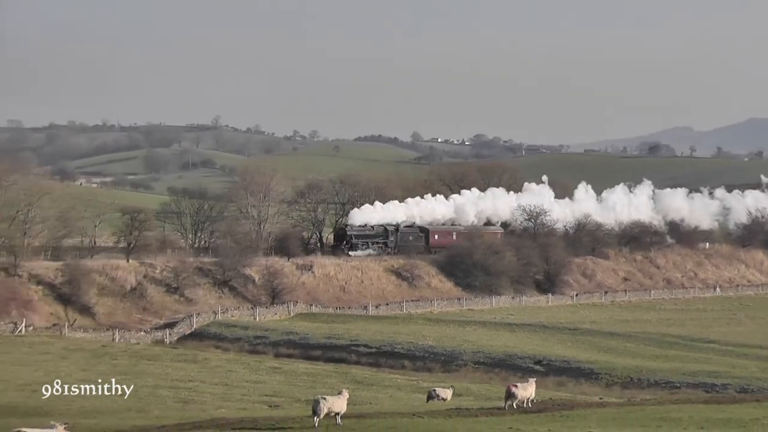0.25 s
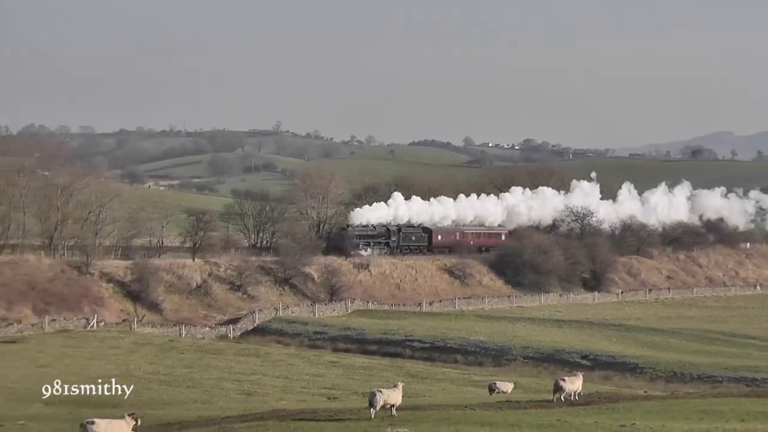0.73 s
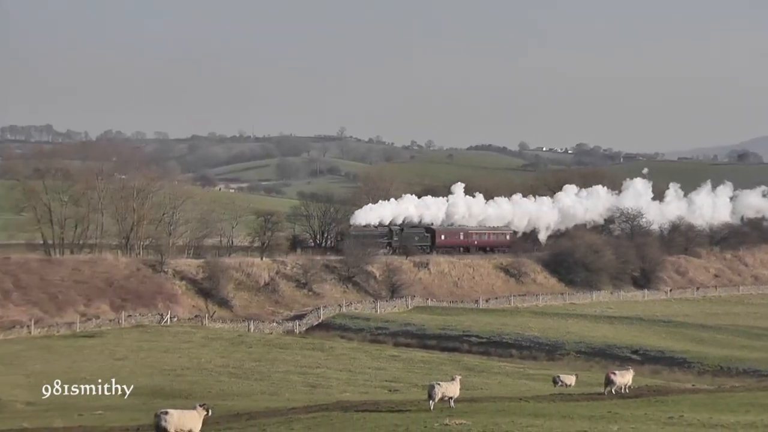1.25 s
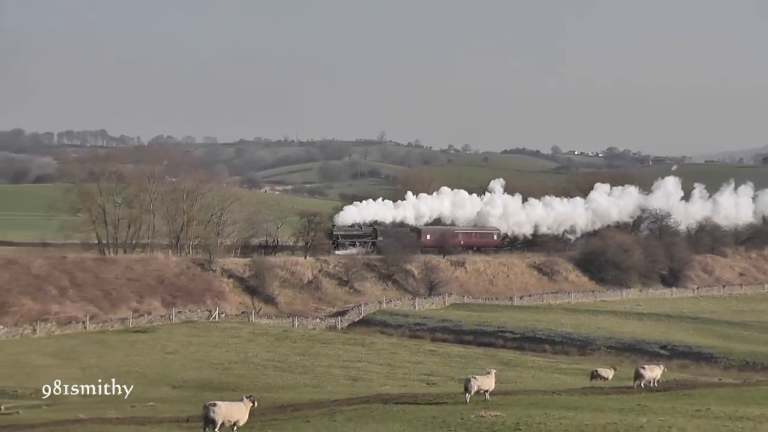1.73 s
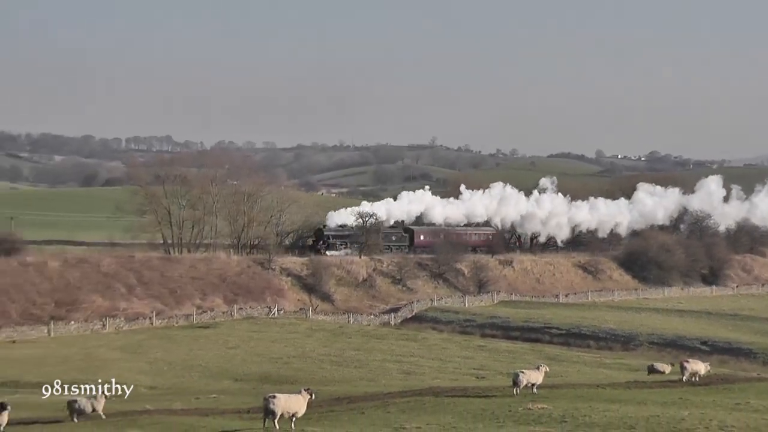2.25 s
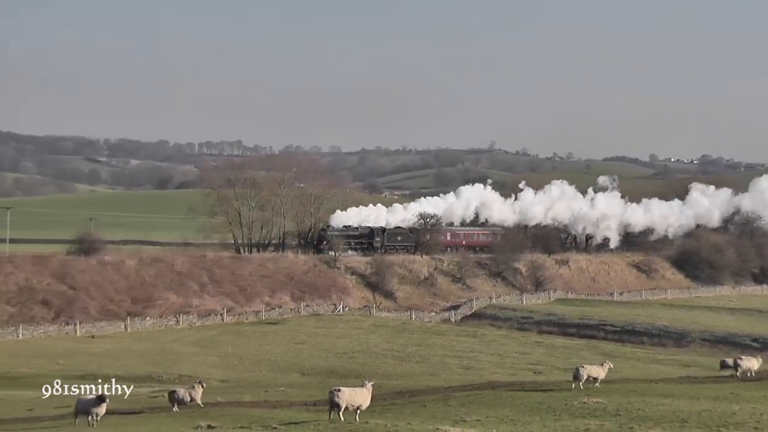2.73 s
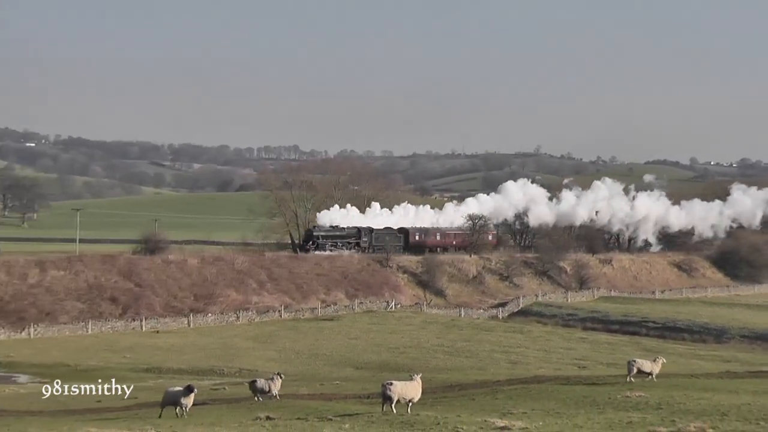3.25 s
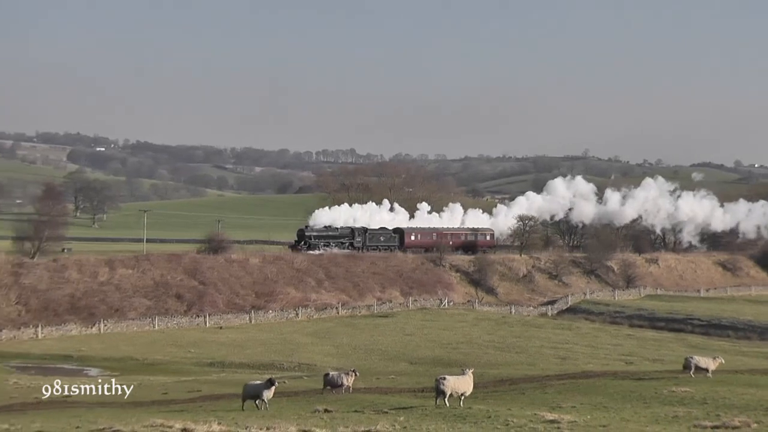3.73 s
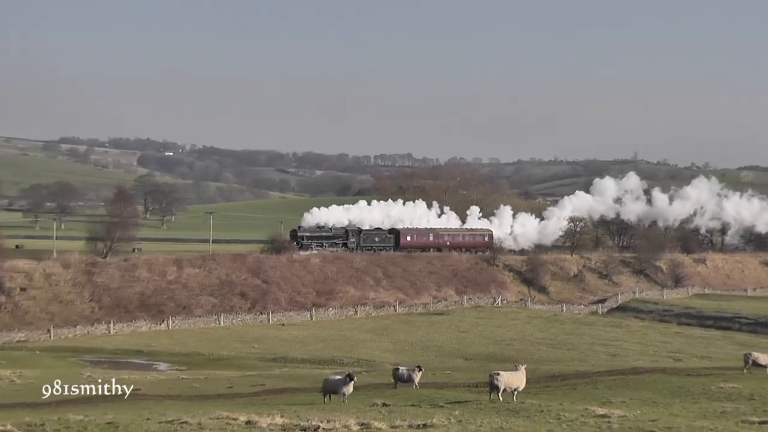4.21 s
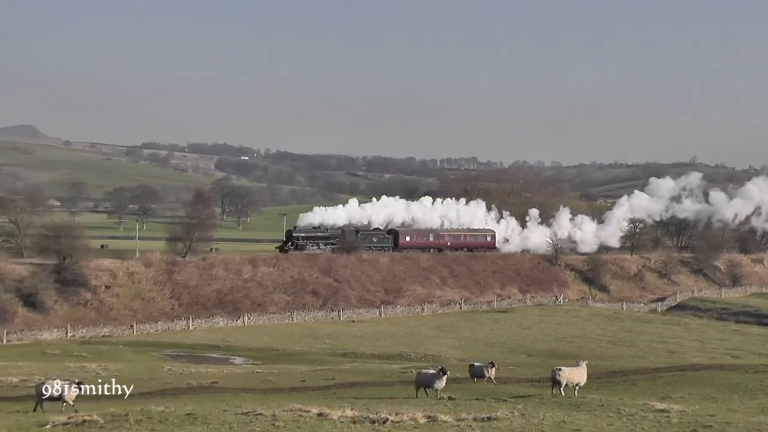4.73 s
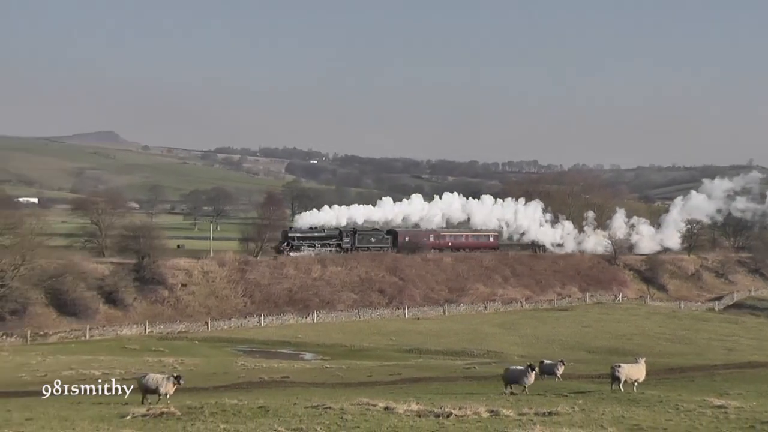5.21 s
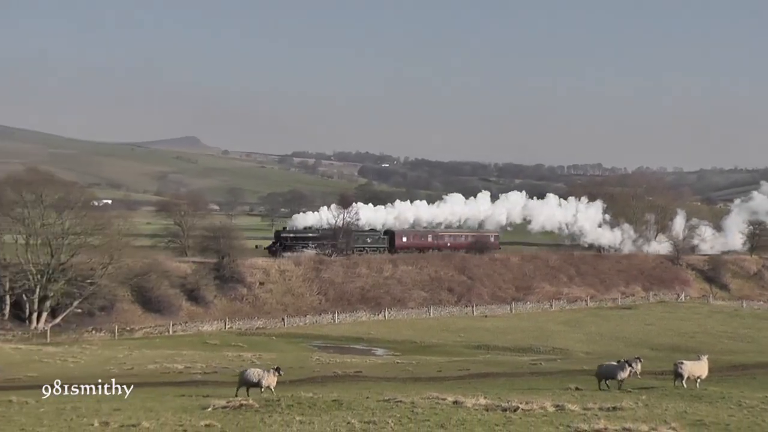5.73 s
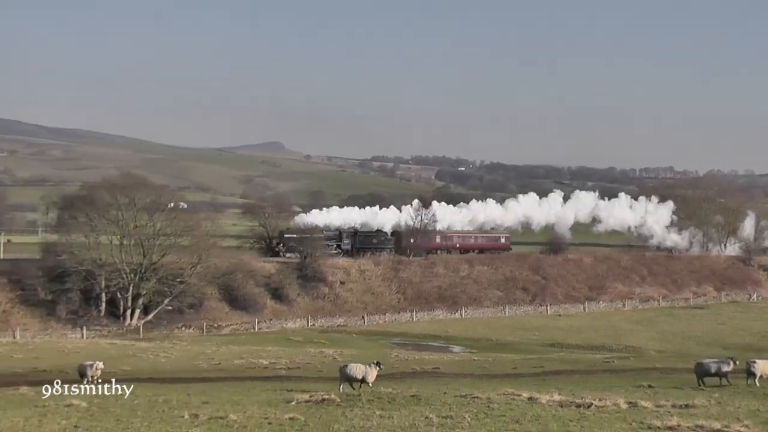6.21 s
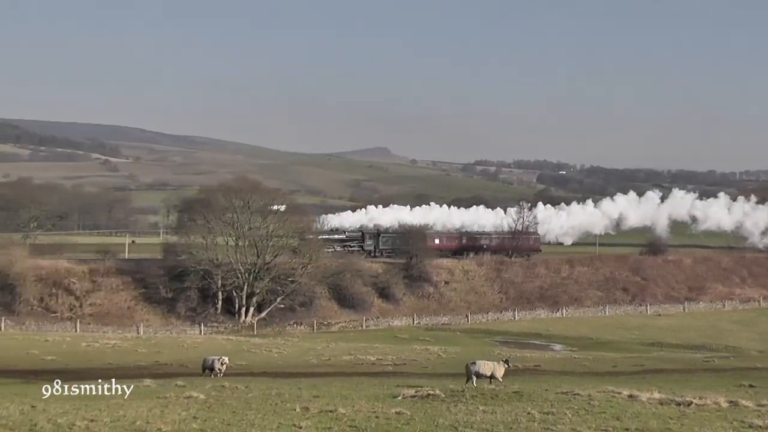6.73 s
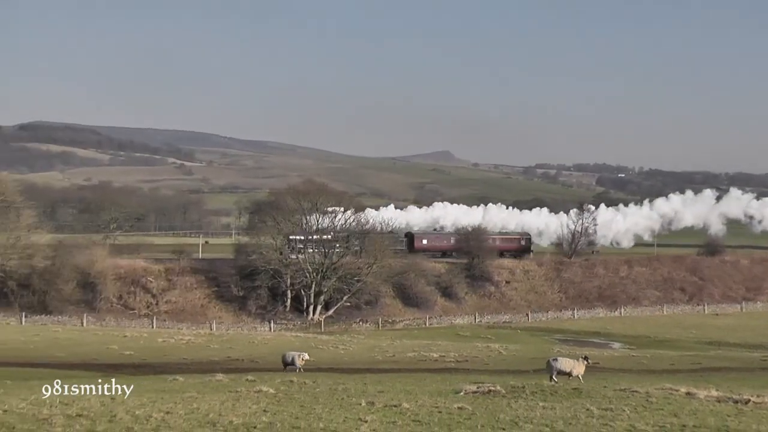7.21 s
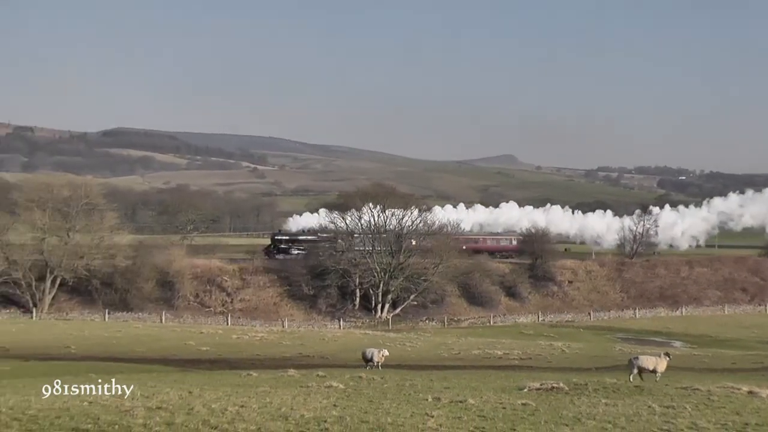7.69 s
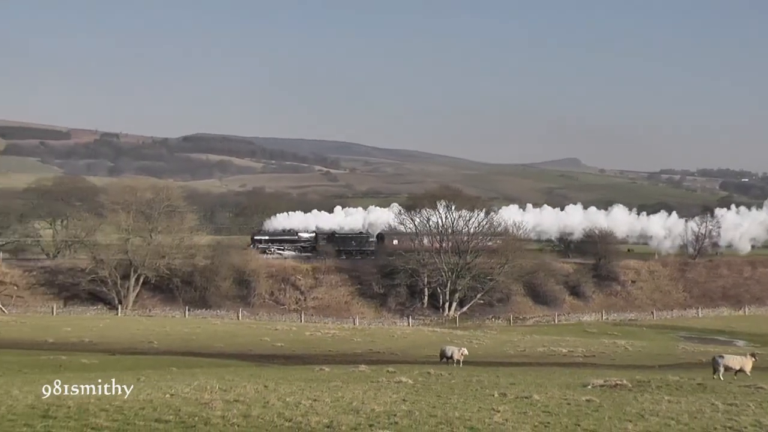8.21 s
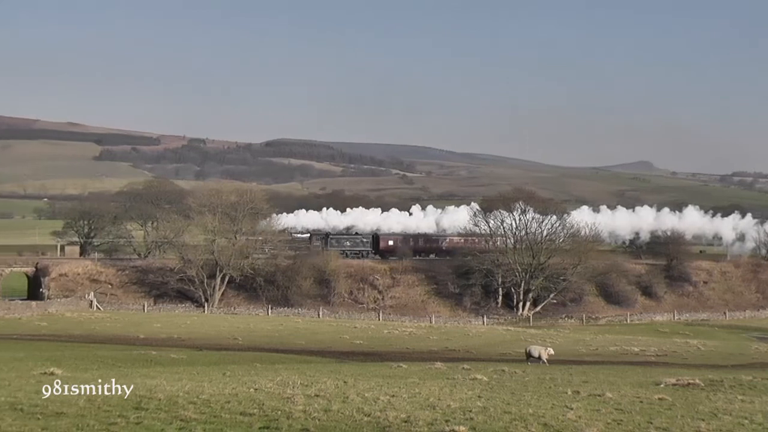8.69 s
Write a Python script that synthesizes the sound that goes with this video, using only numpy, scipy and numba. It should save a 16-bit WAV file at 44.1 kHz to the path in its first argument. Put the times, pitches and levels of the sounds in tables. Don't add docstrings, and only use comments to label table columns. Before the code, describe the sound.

Distant speeding steam train: quick chuffing thuds merge into a flutter, wheels roar and faintly ring, and wavering hiss grows louder and clearer.

```python
import sys
import numpy as np
from scipy import signal
from scipy.fft import rfft, irfft
from scipy.io import wavfile
from scipy.ndimage import uniform_filter1d
from numba import njit

SR = 44100
rng = np.random.default_rng(int(sys.argv[2]) if len(sys.argv) > 2 else 0)


def store_pcm(level_fs):
    pcm = np.round(np.clip(level_fs, -1, 1) * 32767).astype(np.int16)
    wavfile.write(sys.argv[1], SR, np.atleast_2d(pcm).T)


def to_linear_factor(level_db):
    exponent = np.asarray(level_db, float) / 20
    return 10 ** exponent


N = 394694
T = np.arange(N) / SR
COARSE_T = T[::256]
F = np.arange(N // 2 + 1) * SR / N

# time_s, rate_beats_per_s
BEAT_RATE = [
    (0, 19.27),
    (3.2, 19.0),
    (6.5, 18.78),
    (8.95, 18.25),
]
CYLINDER_DB = [-7, -6.5, -6, -8.5]
# time_s, level_db
EFFORT = [(0, -29.5), (.8, -29), (1.1, -24), (1.75, -25.5), (2.0, -27), (2.3, -22.5), (2.7, -26),
          (3.1, -22.5), (3.6, -26), (4.4, -24), (4.8, -26), (5.25, -22), (6.0, -27), (6.25, -19.5),
          (6.8, -24.5), (7.9, -19.5), (8.4, -22.5), (8.95, -20.5)]
# time_s, chimney_hz, rail_hz, rail_ring_share, top_treble_db, bank_echo_share, grass_dip_hz
PATH = [
    (0, 253, 850, 0.7, -13.5, .05, 410),
    (1.5, 263, 858, 1.1, -10, 0, 410),
    (3, 237, 893, 0.7, -7, 0.01, 374),
    (4.5, 222.3, 917, 0.9, -7, 0, 375),
    (6, 215, 940, 0, -2.5, 0.05, 400),
    (7.5, 205, 792, 1, -3.5, 0.17, 418),
    (8.95, 211.3, 766, 0.7, 3, 0, 390),
]
# time_s, level_db, low_tilt_db_per_octave
SCREEN = [(0, -2.5, -12), (.9, -3.5, -12.5), (1.3, -4.5, -0.5), (1.7, 2, -5), (2.4, 1, -4),
          (3.0, 1.5, -5.5), (3.4, -2.5, -2), (3.9, -6.5, 0.5), (4.7, -3.5, 3), (5.2, 2, -1.5),
          (6.1, 3.5, -3), (7.0, -0.5, 0.5), (8.0, 1, -2), (8.5, -1, -3), (8.95, 4, -8)]
# freq_hz, density_db
EXHAUST_SPECTRUM = [(12, -82), (20, -38.5), (97, -13), (141, -4.5), (215, -4), (238, -3), (285, -9),
                    (320, -13), (383, -19), (430, -7.5), (560, -61.5), (950, -120)]
# freq_hz, density_db
ROAR_SPECTRUM = [(240, -50), (400, -24), (465, -8), (545, -4.5), (649, -3.5), (742, -8.5), (858, -4),
                 (1460, -9.5), (1700, 0.5), (2210, -40.5), (3740, -120)]
# freq_hz, density_db
HISS_SPECTRUM = [(1500, -3.5), (1900, -2), (2300, -3), (2800, -1), (3250, -2), (3800, -6.5), (4400, -11),
                 (4900, -9), (5500, -10), (6500, -15), (7600, -20), (8300, -24), (9000, -31),
                 (10500, -41.5)]
# freq_hz, level_db
SCATTER = [(40, -10.5), (150, -29.5), (350, -16), (800, -18.5), (3000, -16), (6000, -16.5), (9000, -9)]
# centre_s, length_s, pitch_hz, width_hz, level_db
SINGING_WHEELS = [(1.754, 0.66, 873, 59.6, -24), (1.95, 0.47, 2820, 300, -26.5),
                  (2.727, 0.17, 2460, 400, -21), (4.656, 0.036, 3700, 300, -19.5),
                  (5.37, 0.16, 2320, 130, -21.5), (5.642, 0.13, 2330, 90, -20.5),
                  (6.9, 0.94, 1920, 199, -26), (6.804, 1, 643, 90, -25), (7.462, .2, 3200, 247, -22),
                  (8.05, 0.42, 3100, 400, -21.5), (8.097, 0.26, 2260, 150, -27.5),
                  (8.293, 0.29, 2850, 300, -26.5), (8.63, 0.57, 2950, 445, -22)]
# centre_s, length_s, pitch_hz,
# width_hz, level_db
JET_FLARES = [(5.1, 0.042, 3700, 1500, -33), (5.37, 0.049, 5300, 2200, -19),
              (5.68, 0.064, 4900, 980, -22.5), (4.27, .1, 2000, 700, -24.5),
              (6.033, .06, 3400, 1600, -20.5), (6.39, 0.13, 3540, 610, -25.5),
              (6.95, 0.064, 5200, 1200, -18.5), (7.23, 0.037, 5430, 990, -19),
              (8.4, 0.051, 3810, 1500, -21), (3.3, .16, 3600, 1200, -36), (8.78, 0.043, 6700, 1500, -23),
              (6.39, .12, 5700, 1500, -24), (1, 2.2, 872, 35, -32.5)]
# centre_s, length_s, pitch_hz, gain_db
EDDIES = [(0.039, 0.088, 2670.0, 6), (0.375, 0.96, 3280.0, 11.5), (1.368, 1.04, 4320.0, 13.5),
          (1.52, 0.53, 1240.0, 7.5), (1.819, 0.17, 3550.0, 8.5), (2.052, 0.51, 3060.0, 13),
          (2.27, 0.28, 1170.0, 3.5), (2.656, 0.56, 7070.0, 8.5), (2.687, 0.2, 2250.0, 3),
          (2.741, 0.41, 2610.0, 12.5), (3.322, 0.24, 4080.0, 9.5), (3.85, 0.28, 3330.0, 3.5),
          (4.002, 0.15, 2810.0, 5), (4.44, 0.66, 1820.0, 10.5), (4.527, 0.73, 6410.0, 14.5),
          (4.679, 0.17, 3060.0, 4.5), (4.96, 0.14, 5790.0, 8), (5.317, 0.33, 5150.0, 14.0),
          (5.46, 0.93, 1780.0, 10), (5.682, 0.25, 5020.0, 10), (6.04, 0.29, 4480.0, 4.5),
          (6.405, 0.33, 6610.0, 10.5), (6.9, 1.52, 1320.0, 9.5), (6.939, 0.1, 7070.0, 4),
          (6.953, 1.39, 5680.0, 10.5), (7.457, 0.26, 3170.0, 10), (7.998, 0.45, 3540.0, 13),
          (8.293, 0.15, 3700.0, 6.5), (8.579, 0.91, 2440.0, 9.5), (8.69, 0.23, 7070.0, 2.5)]
# centre_s, length_s, pitch_hz, gain_db
WISPS = [(0.15, 0.24, 1093, -3), (0.62, 0.14, 5400, -1.5), (0.84, 0.12, 3800, 5), (1.28, 0.26, 2760, 5.5),
         (1.48, 0.12, 1095, 5.5), (1.69, 0.8, 7070.0, 2), (2.15, 0.091, 3850.0, -7), (2.69, 0.16, 4100, -5),
         (3.06, 0.11, 2010.0, 3), (3.58, 0.43, 2500, 3), (3.76, 0.33, 1260, -3), (4.1, 0.25, 2140, 2.5),
         (4.21, 0.57, 3610.0, -4), (4.44, 0.17, 1090.0, -3), (4.6, 0.22, 1800, 3.5),
         (4.73, 0.56, 4530, 1.5), (5.08, 0.14, 1570, -2.5), (5.14, 0.1, 3060, 5.0), (5.55, 0.14, 1650, -4),
         (5.8, 0.2, 7100, -3.5), (5.97, 0.18, 1410, 3.5), (6.2, 0.12, 3700, 3), (6.43, 0.13, 2230.0, -6.5),
         (7.14, 0.092, 2990.0, 4), (7.78, 0.17, 3790.0, -3), (7.99, 0.078, 3610.0, -6.1),
         (8.34, 0.5, 1400.0, -1.5), (8.44, 0.38, 5870.0, -0.5), (8.79, 0.097, 2760, 6),
         (9.01, 0.64, 5920.0, -2)]
# centre_s, length_s, gain_db
CLEARINGS = [(4.9, .1, 3), (5.167, .07, 7.5), (5.579, .08, 8), (6.416, 0.068, 7.5), (6.575, .11, 6),
             (6.92, .12, 9.5), (7.21, .11, 7), (7.396, .1, 8), (7.87, 0.22, 9.5), (8.0, 0.044, 1.5),
             (8.33, 0.11, 5), (8.477, 0.054, 6.5), (8.595, .1, 4.5), (8.8, .05, 2.5)]
# centre_s, length_s, pitch_hz, width_hz, depth_share
SHADOWS = [
    (6.87, 2.3, 1575, 275, 0.8),
    (3.14, 2.2, 1450, 430, 0.3),
    (6.8, 3.4, 2580, 380, 0.5),
    (0.66, 1.5, 640, 120, 0.2),
    (6.6, 0.9, 4450, 250, 0.45),
]
# pitch_hz, width_hz, depth_share
HOUSING_DIPS = [(2610, 80, 0.4), (4440, 152, 0.5)]
# freq_hz, level_db
RIGHT_OVER_LEFT = [(40, 2), (300, 1.64), (1000, 1), (4000, 0.96)]
# freq_hz, level_db
TREBLE_GATE = [(5000, -100), (7000, -93), (8500, -67), (10000, -69.5)]

FIRST_BEAT_CYCLES = -.5
MID_APPROACH_S = 4.5
CLOSING_DB_PER_S, BRIGHTER_DB_PER_S = 1.4352, 0.74
EDDY_HALF_WIDTH_OCTAVES, WISP_HALF_WIDTH_OCTAVES = 1.195, 0.4
THUD_DB, THUD_DB_PER_S = -38.5, 1.2
OVERTONE_DB, OVERTONE_FOLLOWS = -39, 0.24
ROAR_DB, HISS_DB = -22, -21.5
HAZE_DB = -4
BANK_RIDGE_HZ = 410


def columns(table):
    s, *rest = np.transpose(table)
    return [np.interp(T, s, c) for c in rest]


def shape(table, hz):
    f, db = np.transpose(table)
    return to_linear_factor(np.interp(np.log(hz + 1), np.log(f), db))


def bell(centre_s, length_s):
    return np.exp(-((T - centre_s) / length_s * 2) ** 2)


def walk(rate_hz):
    hold = int(SR / rate_hz)
    held = np.repeat(rng.standard_normal(N // hold + 1), hold)
    slewed = uniform_filter1d(uniform_filter1d(held, hold), hold)
    return 1.45 * slewed[:N]


@njit
def ring(x, hz, width_hz):
    y, band, low = np.empty(len(x)), 0., 0.
    for i in range(len(x)):
        g, damping = np.tan(np.pi * hz[i] / SR), width_hz / hz[i]
        v = (band + g * (x[i] - low)) / (1 + g * (g + damping))
        band, low, y[i] = 2 * v - band, low + 2 * g * v, damping * v
    return y


def ring_both(pair, hz, width_hz):
    return np.array([ring(c, hz, width_hz) for c in pair])


def patches(table, hz, octaves):
    s, length_s, centre_hz, db = np.transpose(table)
    in_time = np.exp(-((COARSE_T[:, None] - s) / length_s * 2) ** 2)
    in_pitch = np.exp(-(np.log2(hz / centre_hz) / octaves) ** 2)
    return in_time @ (db * in_pitch)


def eddies(hz, share):
    db_per_s = CLOSING_DB_PER_S + BRIGHTER_DB_PER_S * np.clip(np.log2(hz / 2500), -2, 1)
    closing_db = db_per_s * (COARSE_T - MID_APPROACH_S)
    gain_db = share * (closing_db + patches(EDDIES, hz, EDDY_HALF_WIDTH_OCTAVES))
    gain_db = gain_db + patches(WISPS, hz, WISP_HALF_WIDTH_OCTAVES)
    mean_db = 10 * np.log10(np.mean(to_linear_factor(gain_db) ** 2))
    return np.interp(T, COARSE_T, gain_db - mean_db)


def turbulence(table, lo_hz, hi_hz, count, patchy_db, rate_hz, drive, swell=lambda hz: 0):
    noise = rfft(rng.standard_normal((2, N)) * drive) * shape(table, F)
    noise[1] *= shape(SCATTER, F)
    place = np.log((F + 1) / lo_hz) / np.log(hi_hz / lo_hz) * count
    out = 0
    for k in range(count):
        strip = np.cos(np.pi / 2 * np.clip(place - k - .5, -1, 1))
        centre_hz = lo_hz * (hi_hz / lo_hz) ** ((k + .5) / count)
        db = patchy_db * walk(rate_hz) + swell(centre_hz)
        out = out + irfft(noise * strip, N) * to_linear_factor(db)
    return out / np.std(out[0])


def beats(depth, lag_beats, scatter_db):
    phase = np.cumsum(columns(BEAT_RATE)[0]) / SR + FIRST_BEAT_CYCLES + 4 - lag_beats
    count = phase.astype(int)
    size = to_linear_factor(np.array(CYLINDER_DB)[count % 4] + scatter_db * rng.standard_normal(256)[count])
    part = phase - count
    pulse = size * 6 * part * np.exp(-part / 0.29)
    puff = 1 + depth * (pulse - .5)
    return puff / np.sqrt(np.mean(puff ** 2))


def singing():
    out = np.zeros((2, N))
    for s, length_s, hz, width_hz, db in SINGING_WHEELS + JET_FLARES:
        centre_hz = np.full(N, 1. * hz)
        tone = ring(rng.standard_normal(N), centre_hz, 1.4 * width_hz)
        tone = ring(tone, centre_hz, 1.4 * width_hz)
        out[0] += to_linear_factor(db) * tone / np.std(tone) * bell(s, length_s)
    air_loss = np.hypot(1, (F / 7300) ** 8)
    return irfft(rfft(out) / air_loss, N)


def steam():
    air_db, echo = columns(PATH)[3:5]
    drive = beats(0.19, 0.22, 2.8) * to_linear_factor(1.47 * walk(70))
    air_db = air_db + 3.0 + .8 * walk(6)
    clear_db = HAZE_DB + sum(db * bell(s, length_s) for s, length_s, db in CLEARINGS)

    def swell(hz):
        top_db = clear_db * np.clip((hz - 7600) / 1400, 0, 1)
        eddy_db = eddies(min(hz, 6500), np.interp(hz, [6000, 8500], [1, .7]))
        loss_db = air_db * max(np.log2(hz / 5200) * 1.63, 0)
        return top_db + eddy_db + loss_db + 2.0 * walk(35)

    hiss = turbulence(HISS_SPECTRUM, 1600, 10800, count=22, patchy_db=1.6, rate_hz=11, drive=drive, swell=swell)
    late = np.array([np.interp(T - 1 / BANK_RIDGE_HZ, T, c) for c in hiss])
    return to_linear_factor(HISS_DB) * (hiss + echo * late) / np.sqrt(1 + echo ** 2)


def wheels():
    rail_hz, ring_share = columns(PATH)[1:3]
    level_db, low_tilt_db = columns(SCREEN)

    def swell(hz):
        reach = np.clip((hz - 900) / 450, 0, 1)
        screen_db = level_db + low_tilt_db * np.clip(np.log2(890 / hz), 0, .6)
        return (1 - reach) * screen_db + eddies(hz, reach)

    drive = beats(0.35, .1, 3)
    roar = turbulence(ROAR_SPECTRUM, 410, 1590, count=10, patchy_db=1.1, rate_hz=4, drive=drive, swell=swell)
    roar = roar + 0.98 * ring_share * ring_both(roar, rail_hz, 66.0)
    return to_linear_factor(ROAR_DB - 0.54) * roar


def exhaust():
    boom_db, = columns(EFFORT)
    thud_db = THUD_DB + THUD_DB_PER_S * (T - MID_APPROACH_S)
    over_db = OVERTONE_DB + OVERTONE_FOLLOWS * (boom_db - boom_db.mean())
    chimney_hz = columns(PATH)[0]
    drive = beats(1.2, 0, 2.1)
    thud_drive = beats(1.3, -.25, 2.1)
    thud = turbulence(EXHAUST_SPECTRUM, 25, 125, count=4, patchy_db=.6, rate_hz=8, drive=thud_drive)
    boom = turbulence(EXHAUST_SPECTRUM, 131.2, 284.7, count=4, patchy_db=1.7, rate_hz=9.6, drive=drive)
    boom = boom + 0.92 * ring_both(boom, chimney_hz, 52.0)
    boom = boom - 0.91 * ring_both(boom, 1.21 * chimney_hz, 45.)
    over = turbulence(EXHAUST_SPECTRUM, 294, 420.6, count=3, patchy_db=1.4, rate_hz=9.4, drive=drive)
    boom = to_linear_factor(boom_db) * boom / np.std(boom[0])
    return boom + to_linear_factor(thud_db + 1.1) * thud + to_linear_factor(over_db + 1.5) * over


def scene():
    direct, scattered = exhaust() + wheels() + singing() + steam()
    direct = direct - 0.58 * ring(direct, columns(PATH)[5], 63.0)
    for s, length_s, hz, width_hz, depth in SHADOWS:
        direct = direct - depth * bell(s, length_s) * ring(direct, np.full(N, 1. * hz), 1. * width_hz)
    return np.array([direct + scattered, direct - scattered])


def low_pass(x):
    return signal.sosfilt(signal.butter(12, 10530, fs=SR, output="sos"), x)


def record(dry):
    dips = [1 - depth / (1 + ((F - hz) / width_hz * 2) ** 2) for hz, width_hz, depth in HOUSING_DIPS]
    gain = np.prod(dips, axis=0)
    gain = gain * F / np.hypot(F, 45.)
    gain = gain * shape(RIGHT_OVER_LEFT, F) ** np.array([[-.5], [.5]])
    heard = 1.4 * np.tanh(irfft(rfft(dry) * gain, N) / 1.4)
    hz, _, cells = signal.stft(heard, SR, nperseg=2048, noverlap=1024)
    strength = uniform_filter1d(abs(cells), size=3, axis=1)
    jumps = np.repeat(rng.standard_normal((129, cells.shape[-1])), 8, axis=0)[:len(hz)]
    threshold = shape(TREBLE_GATE, hz)[:, None] * to_linear_factor(2.9 * jumps)
    _, kept = signal.istft(cells * (strength > threshold), SR, nperseg=2048, noverlap=1024)
    return low_pass(kept[:, :N])


dry = scene()
out = record(dry)
store_pcm(out)
```